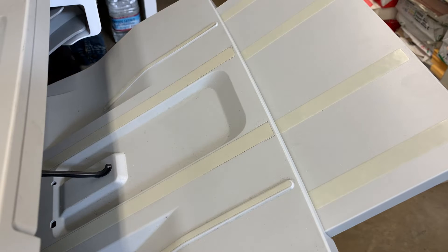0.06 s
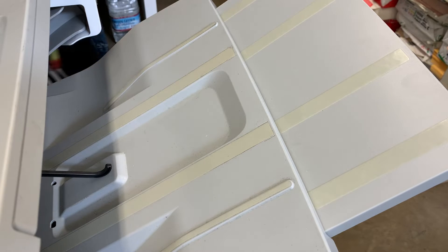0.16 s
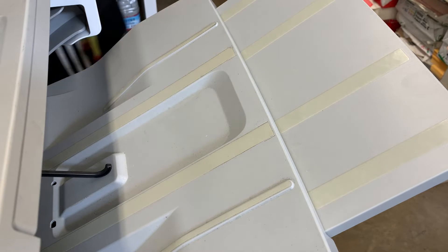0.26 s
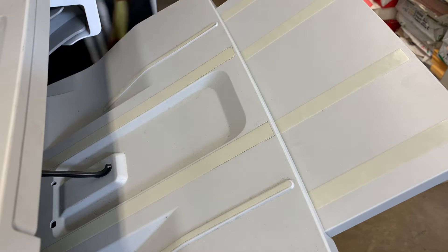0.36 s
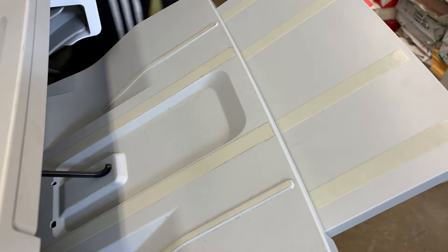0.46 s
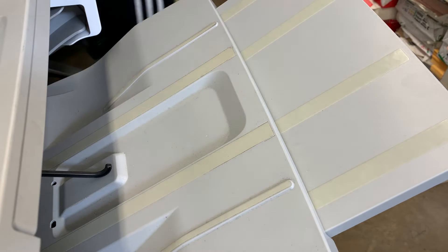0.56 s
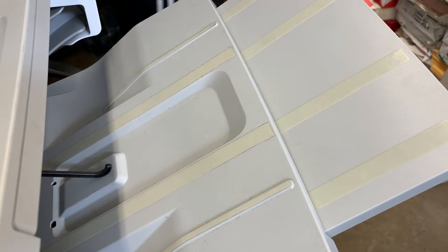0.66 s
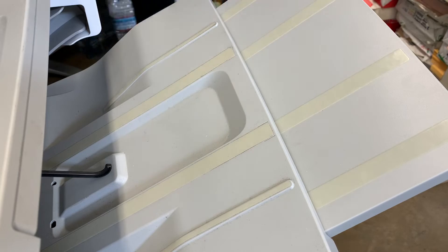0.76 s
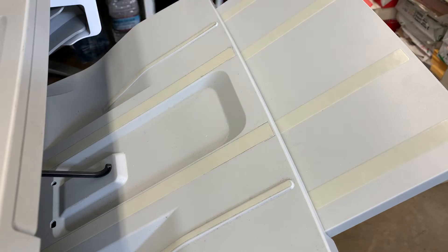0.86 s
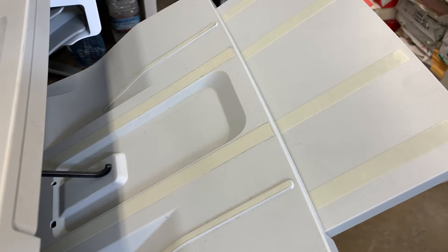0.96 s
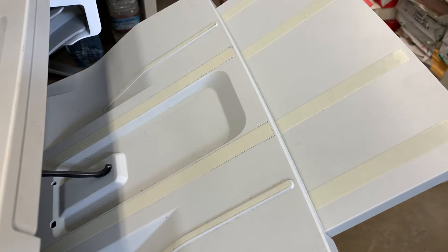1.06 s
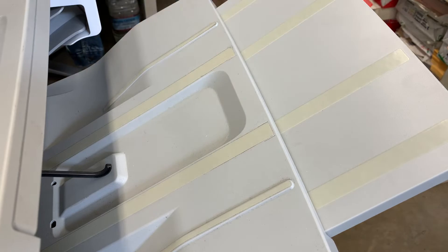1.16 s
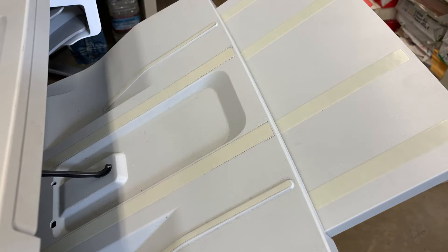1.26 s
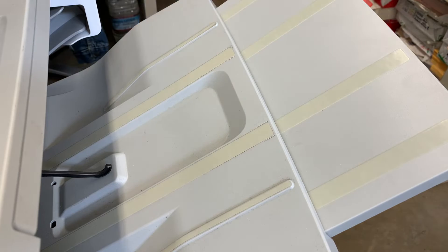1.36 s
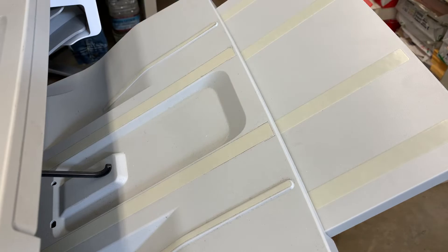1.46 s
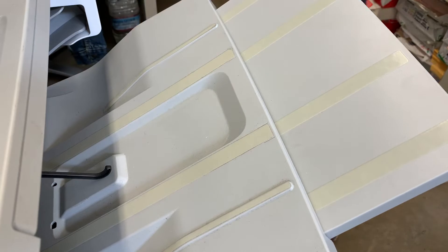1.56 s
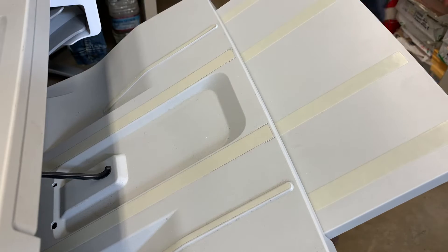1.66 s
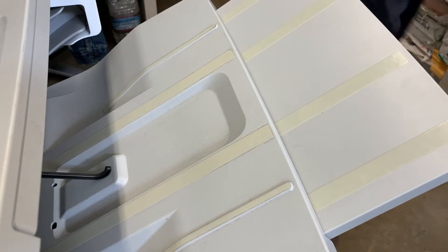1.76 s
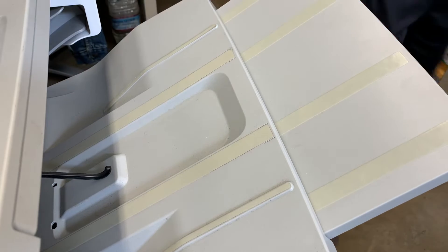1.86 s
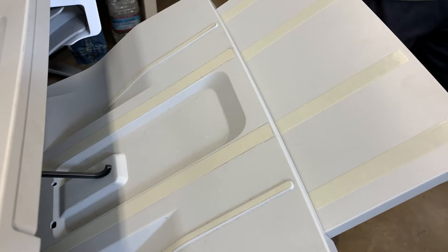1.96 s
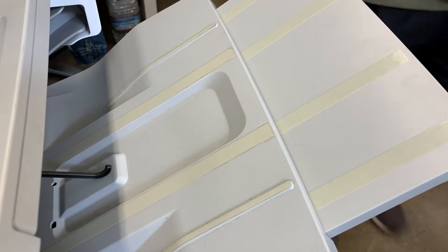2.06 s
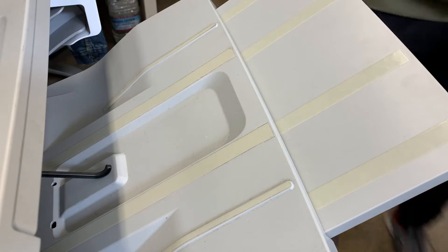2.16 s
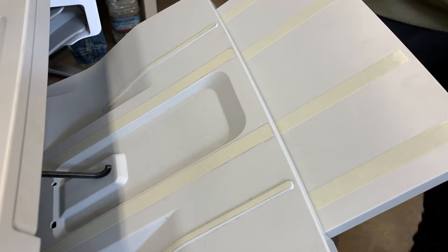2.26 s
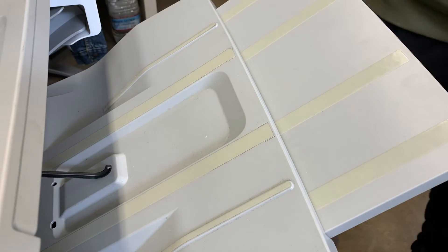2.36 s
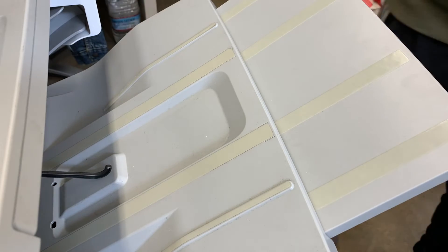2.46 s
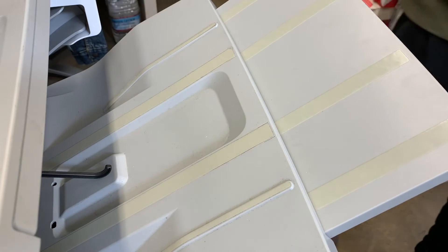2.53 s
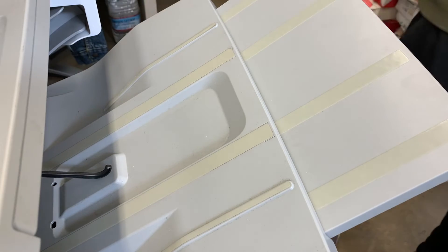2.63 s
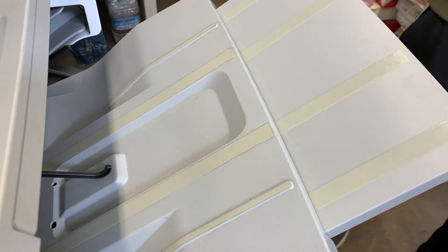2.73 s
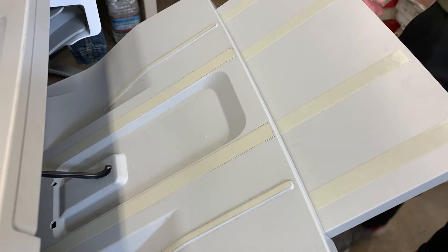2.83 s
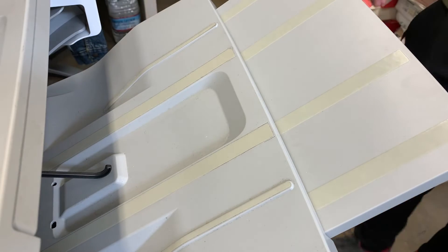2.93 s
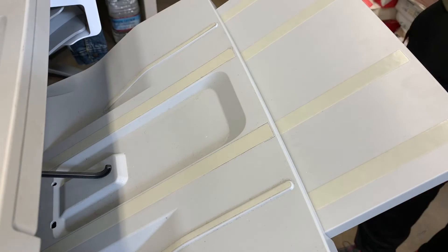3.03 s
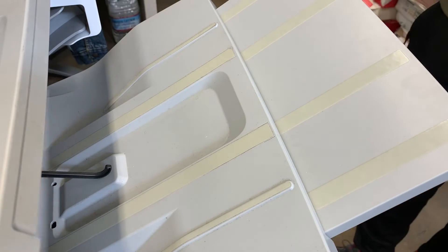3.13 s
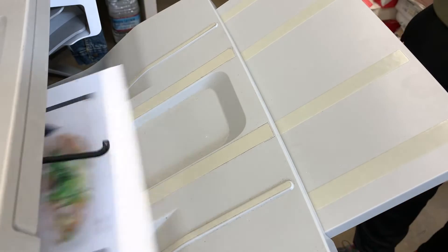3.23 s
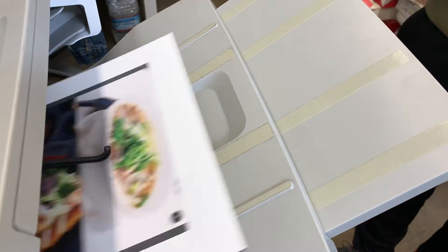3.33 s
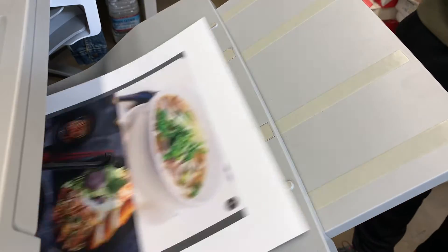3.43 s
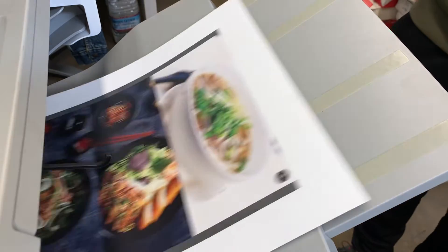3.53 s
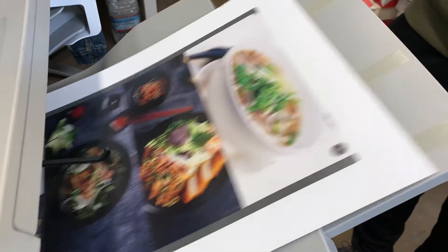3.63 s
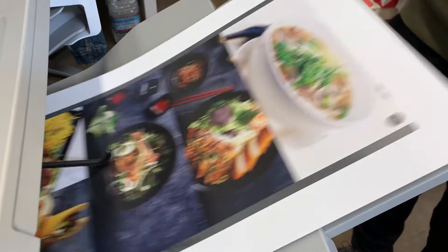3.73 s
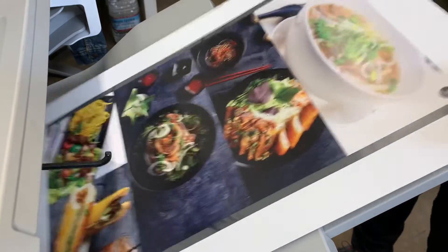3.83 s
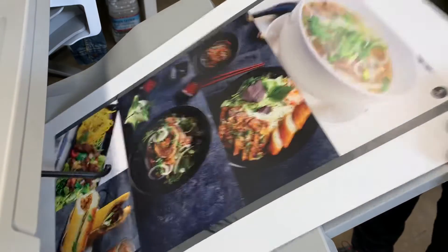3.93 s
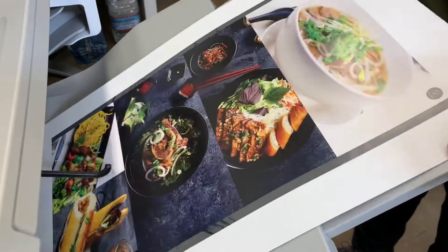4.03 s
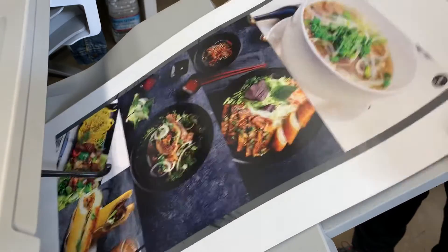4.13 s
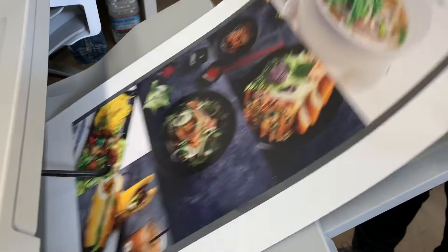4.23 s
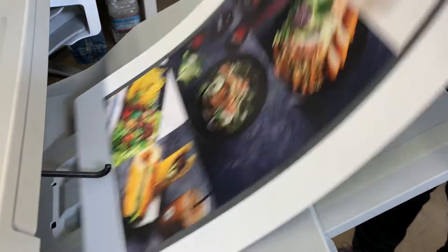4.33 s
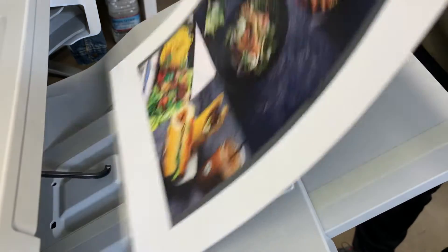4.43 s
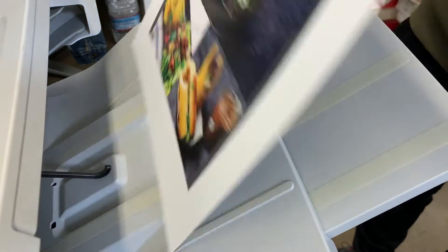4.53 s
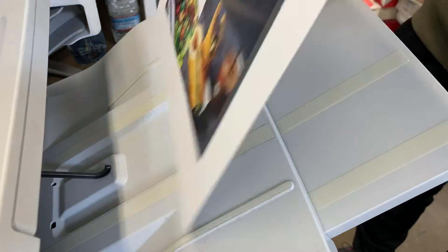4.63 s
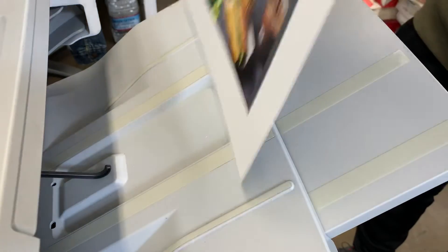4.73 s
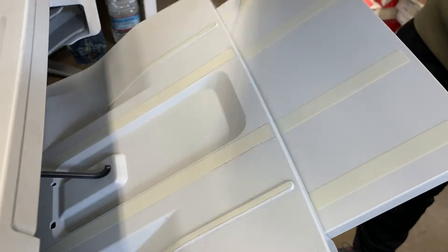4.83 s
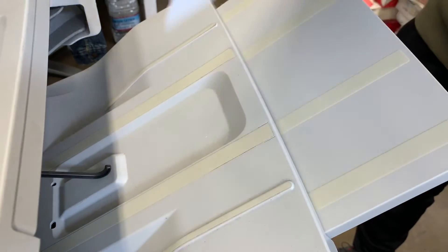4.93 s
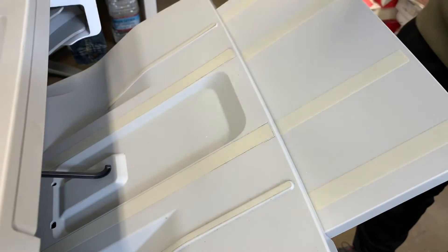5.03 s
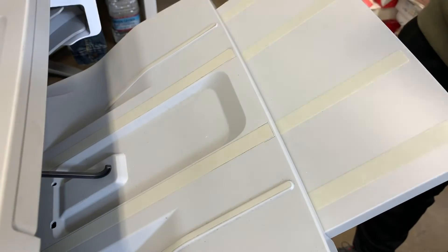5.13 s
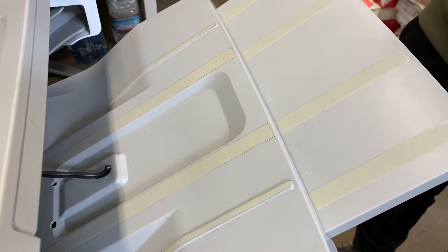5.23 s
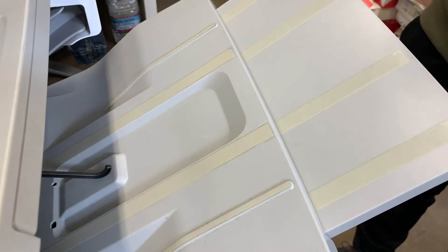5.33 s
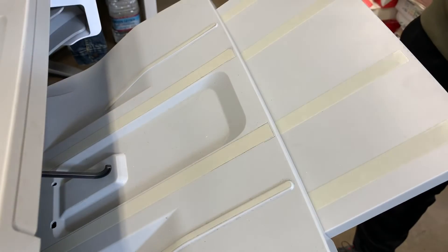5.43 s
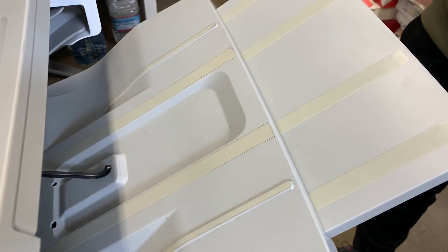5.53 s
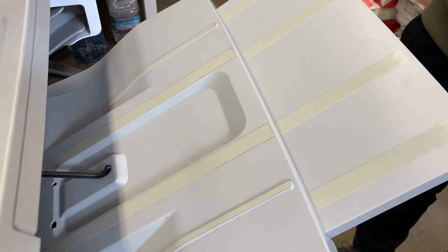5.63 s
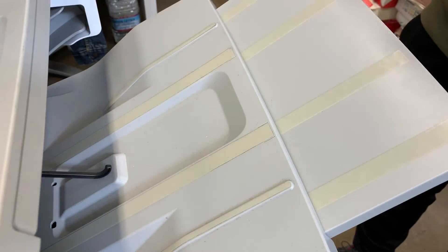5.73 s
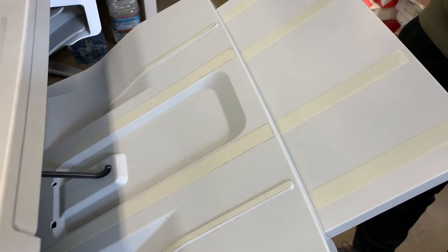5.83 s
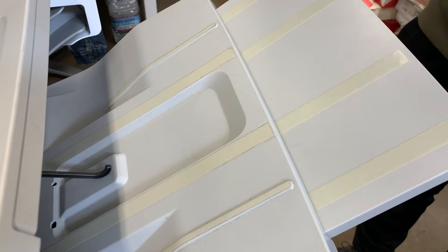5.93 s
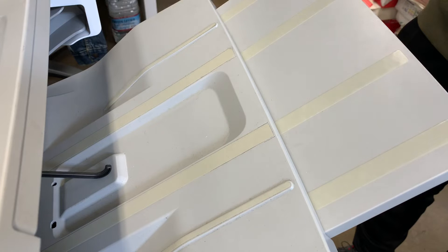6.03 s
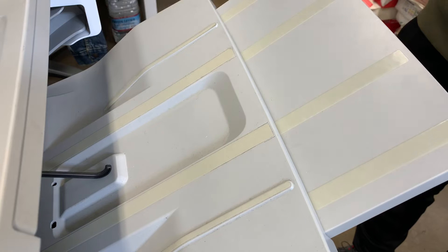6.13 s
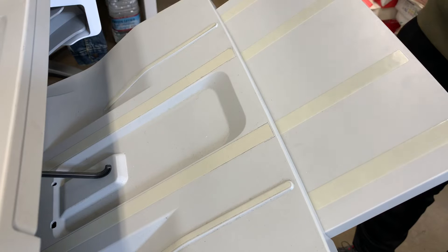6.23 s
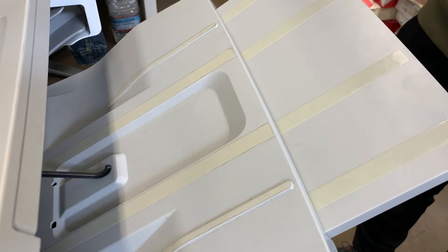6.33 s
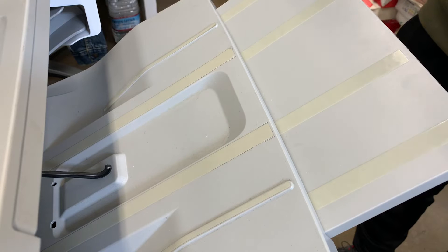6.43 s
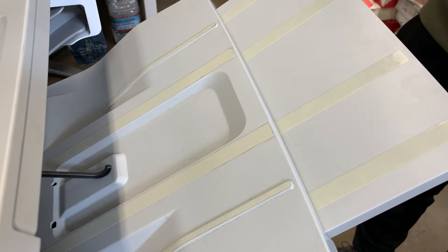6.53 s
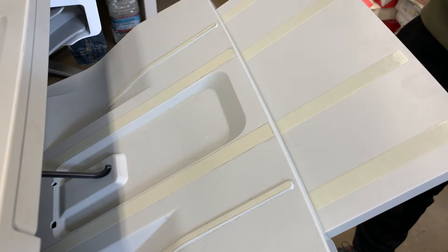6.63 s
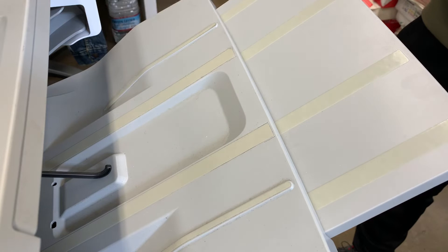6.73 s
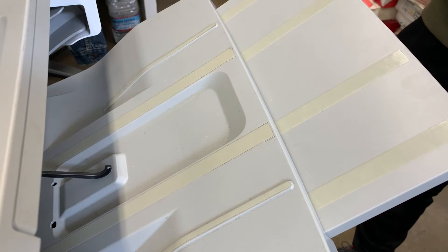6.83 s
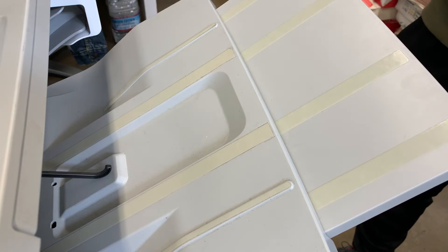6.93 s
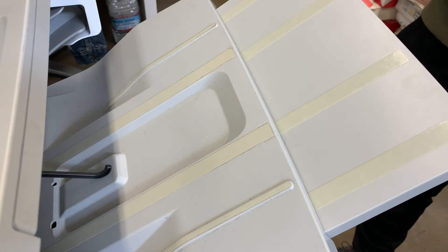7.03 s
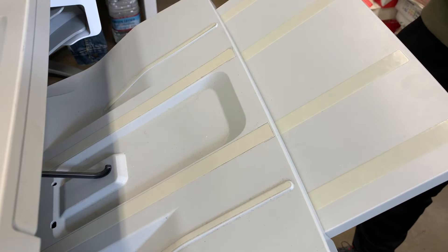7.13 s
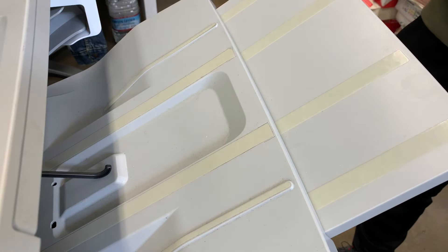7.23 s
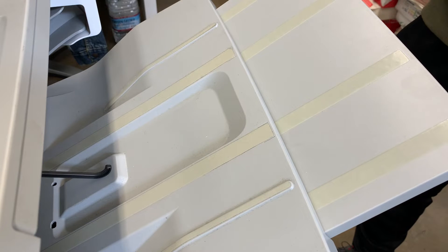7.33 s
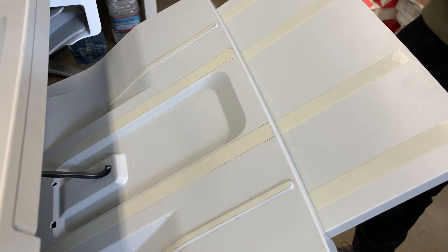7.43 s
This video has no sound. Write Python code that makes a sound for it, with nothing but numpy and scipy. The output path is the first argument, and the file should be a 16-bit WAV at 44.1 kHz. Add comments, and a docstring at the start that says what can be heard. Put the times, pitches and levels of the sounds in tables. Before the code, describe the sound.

A printer drones with small surges at first, heard closely in stereo by a hand-held camera. Someone steps around it with gritty scrapes and crisp ticks. Stiff paper judders out, drums and crinkles on the hollow tray, and is tugged off, its tail and the wire arm smacking the plastic sharply. After a dull floor thud and a few clacks, the machine noise gradually sinks, leaving soft fan air, low hum and a thin faint whine.

```python
"""An office printer in a small room, close to a hand-held camera with two microphone ports:
shaped gear and fan noise, over the sine lines of drive, blades, rotor and mains, to the left.
Someone steps round it on a gritty floor: noise bursts and resonances make scuffs, clicks and knocks.
A sheet, built of tiny grains, comes out, judders by stick-slip under the wire arm and slides over the tray.
It is pulled away with a slap of noise and plastic modes; the drive winds down, leaving fan and hum."""
import sys
import numpy as np
from scipy import signal
from scipy.fft import rfft, irfft, next_fast_len
from scipy.io import wavfile
from scipy.ndimage import uniform_filter1d, map_coordinates

SR = 44100
rng = np.random.default_rng(int(sys.argv[2]) if len(sys.argv) > 2 else 0)


def transcribe(u):
    """Save the signal u as a 16-bit wav file named by the first command-line argument.

    u: samples, shape (n,) or (channels, n), limited to [-1, 1]; the rate is SR.
    q: integer samples, one column per channel.
    """
    v = np.clip(np.atleast_2d(u).T, -1, 1)
    q = np.round(v * 32767).astype(np.int16)
    wavfile.write(sys.argv[1], SR, q)


N = 329943

# All levels in dB are relative; the mix trims some of the layers.
# Steady lines of the drive and of the fan blades. Each row: frequency in Hz, level in dB.
DRIVE_LINES = [(275, -52.5), (330, -52), (440, -50), (552, -54.5), (657, -58), (687, -54.5), (1373, -68.5),
               (1604, -74), (2062, -72.5), (2638, -68.5), (2676, -78), (3806, -75)]
FAN_LINES = [(355, -57.5), (409, -60.5), (549, -65.5), (1071, -75.5), (1610, -74)]
DRIVE_TONES_DB, FAN_TONES_DB = -0.5, 2  # trim of each set of lines
# Spectra of gear noise and fan air. Each row: frequency in Hz, density in dB per Hz.
GEAR_SPECTRUM = [(25, -30.5), (80, -12.5), (170, -5), (330, -2), (500, -6), (800, -10.5), (1200, -18),
                 (2000, -22.5), (2800, -28.5), (4500, -33.5), (7000, -49.5), (10000, -55), (15000, -57.5)]
FAN_SPECTRUM = [(25, -45.5), (80, 7.5), (170, 3.5), (260, -3.5), (420, -2), (700, -9), (1200, -7.5),
                (2000, -20), (3000, -24.5), (4500, -33), (7000, -44), (10000, -54.5), (15000, -58)]
GEAR_WAVER_DB = 1.8  # depth of the shifting patches in the gear noise
# The drive runs steadily, coasts once the sheet is out, then dies faster; the fan eases off slowly.
DRIVE_DB, COAST_S, COAST_DB_PER_S = -41.5, 3.63, 3.0
TONES_COAST_DB_PER_S = 3.5  # the drive's lines fade this much faster than its noise
STOP_S, STOP_DB_PER_S = 6.92, 18  # further fall, on top of the coasting
FAN_DB, FAN_EASE_DB_PER_S = -42, 0.44
# The lowest drive line drones up in surges.
# Each row: start in seconds, rise in seconds, hold in seconds, dB over its usual level.
DRONES = [(0, 0.025, 0.13, 9.5), (0.206, 0.061, 0.23, 10.5), (.58, 0.053, .04, 3), (0.923, 0.088, .04, 2),
          (1.596, 0.043, 0.043, 8.5)]
DRONE_T60_S = 0.25
# The low hum swells and sinks in a slow beat.
ROTOR_DB, BEAT_DEPTH_DB, BEAT_S, FIRST_DIP_S = -47, 2.5, 2.12, 0.22
# A thin whine sets in once the sheet is out.
WHINE_HZ, WHINE_DB, WHINE_FROM_S = 2966, -76.5, 4.5

# Dull bumps of the sheet, the housing and the floor. Each row: time in seconds, level in dB.
BUMPS = [(1.164, -33.5), (1.558, -34), (2.303, -28), (2.698, -30), (2.744, -32.5), (3.487, -28),
         (3.763, -28), (3.829, -27), (3.97, -29.5), (4.091, -29), (5.534, -29.5)]
BUMP_T60_S = 0.23
# Spectrum of a bump. Each row: frequency in Hz, density in dB per Hz.
BUMP_SPECTRUM = [(40, -47), (100, 0.5), (200, -6.5), (350, -1), (500, -8), (750, -19.5), (1200, -26.5),
                 (2000, -28), (4000, -63.5)]
# Light clacks of the mechanism. Each row: time in seconds, level in dB, t60 in seconds.
CLACKS = [(1.165, -39, 0.025), (5.131, -45.5, 0.099), (5.26, -45, 0.052), (5.361, -41.5, 0.074),
          (5.398, -43.5, 0.18), (5.436, -32, 0.11)]
# Spectrum of a clack. Each row: frequency in Hz, density in dB per Hz.
CLACK_SPECTRUM = [(100, -28), (700, 4.5), (1300, -2.5), (1750, -2), (2100, 4.5), (2450, -12), (2750, -10),
                  (3400, -14.5), (6000, -26), (14000, -40)]

# Shoe soles dragging, heel then toe.
# Each row: start in seconds, rise in seconds, hold in seconds, scuff level in dB, grit level in dB.
STEPS = [(1.492, 0.0055, 0.0067, -38, -54), (1.512, 0.013, 0.018, -37.5, -56),
         (1.826, 0.075, 0.0042, -38.5, -52), (2.282, 0.011, 0.037, -40.5, -39),
         (2.343, 0.0093, 0.025, -45, -42), (2.575, 0.017, 0.0053, -42, -38.5),
         (5.127, 0.031, 0.055, -62, -82), (5.359, 0.033, 0.064, -57, -65.5)]
SCUFF_T60_S, GRIT_T60_S = 0.12, 0.077
# Hollow ring of the sole, and squeaks of grit under it. Each row: frequency in Hz, width in Hz, level in dB.
SOLE_MODES = [(1140, 120, 0.5), (2070, 110, 0.5), (2500, 79, -3), (2920, 63, -3.5), (3980, 100, -5),
              (4270, 71, -1), (4740, 140, -6), (5340, 74, -15), (6000, 74, -14)]
GRIT_MODES = [(3670, 52, 2), (5640, 110, -7), (6080, 55, 1), (6750, 250, 1.5), (10060, 160, -4.5)]
SOLE_DB, GRIT_RING_DB = -5, -1
# Spectra of scuff and grit. Each row: frequency in Hz, density in dB per Hz.
SCUFF_SPECTRUM = [(250, -36), (500, 8), (750, -3.5), (1000, 4), (1500, -5), (2000, -3), (2400, -3.5),
                  (3300, -7.5), (4600, -8), (5600, -32), (7000, -35), (9500, -11), (12500, -39)]
GRIT_SPECTRUM = [(300, -38), (2000, -4), (4000, -3), (6500, -0.5), (10000, -4), (15000, -26)]
# A hard heel tip clicks on the floor and skids. Each row: time in seconds, level in dB, t60 in seconds.
CLICKS = [(1.501, -33, .045), (1.54, -45, 0.14), (1.895, -46.5, 0.37)]
# Ring of the heel tip. Each row: frequency in Hz, width in Hz, level in dB.
CLICK_MODES = [(2000, 120, -5), (2400, 100, 4), (2950, 90, -2), (4610, 170, 4), (5600, 110, -3),
               (5950, 90, -6), (6830, 100, -6), (7370, 120, -5), (9670, 440, -8)]
# Heels knock hollowly on the floor, lower as the foot settles.
# Each row: time in seconds, level in dB, t60 in seconds, pitch in Hz.
HEELS = [(1.549, -33, 0.16, 1050), (1.592, -36.5, 0.12, 950), (1.909, -38.5, 0.22, 960),
         (1.956, -43, .14, 900)]
# Spectrum of a knock at the pitch HEEL_HZ. Each row: frequency in Hz, density in dB per Hz.
HEEL_SPECTRUM = [(400, -32), (780, 0), (930, 5), (1100, -9), (1300, -11), (2500, -28), (8000, -63)]
HEEL_HZ = 930

# Crisp ticks of grit, paper and mechanism. Each row: time in seconds, level in dB,
# body in dB and snap in dB relative to that level, ring in Hz.
TICKS = [(1.5007, -25, -7, -24, 5720), (1.736, -54.5, -17, 4, 10900), (2.149, -35.5, 1, -6.5, 5300),
         (2.2907, -20, -12, -22, 6500), (2.3034, -20, -3, -15, 7600), (2.359, -19, -10, -31, 6460),
         (2.587, -27, -9, -11, 6740), (2.7717, -37, -1, -34, 6600), (2.818, -32, -15, -39, 5700),
         (3.1354, -29, -5, -16.5, 6750), (3.3054, -22.5, -5, -6, 6160), (3.3425, -17.5, -11, -32, 6690),
         (3.386, -18.5, -11, -22, 7100), (3.4027, -18, -14, -13, 10630), (3.4415, -25, -12, -13, 10800),
         (3.453, -23, -9, -16, 6950), (3.569, -35, -3, -20, 11500), (3.671, -29, -5, -16, 7400),
         (3.7693, -33.5, 3, -5, 2480), (3.795, -32.5, -10, 2, 11500), (3.8047, -23, -10, -13, 11500),
         (3.8555, -25.5, -8, -20, 10300), (3.8645, -21, -13, -20, 6650), (3.886, -31, -10, -20, 6900),
         (3.9078, -25.5, -14, -4, 12400), (3.9455, -24.5, -13, -8, 4200), (3.972, -16, -4, -11, 7000),
         (3.9977, -16, -5.5, -19.5, 6240), (4.0672, -33, -7.5, -3, 11500), (4.1081, -24, -4.5, -12, 6080),
         (4.2035, -34.5, -14, -4, 3400), (4.2098, -32, -10.5, -11, 5050), (4.2411, -24, -11, -5.5, 5000),
         (4.6124, -30, -17, -15, 6800), (4.7092, -21, -11, -2.5, 7170), (4.786, -41, -11, -12, 7000),
         (5.3956, -46, 6.5, -11, 5010), (5.4372, -41, 7, -19, 2100)]
TICK_T60_S, CRACK_DB = 0.04, -10  # the crack is relative to the tick's level
# A tick rings briefly with a few modes near its pitch; the scatter is a share of it (log scale).
PING_DB, PING_T60_S, PING_SCATTER = -9, 0.03, 0.12
# Smaller crinkles fall at random while the sheet bends.
CRINKLE_FROM_S, CRINKLE_TO_S, CRINKLE_DB, CRINKLE_SPREAD_DB = 3.3, 4.03, -33, 1.8
CRINKLE_BODY_DB, CRINKLE_SNAP_DB = -7, -10.5
CRINKLE_LOW_HZ, CRINKLE_HIGH_HZ = 4500, 12000
# Spectra of the rustling sheet, its hiss, the tray drumming and a bright snap.
# Each row: frequency in Hz, density in dB per Hz.
RUSTLE_SPECTRUM = [(400, -27.5), (800, 1), (1200, 1.5), (1800, 0.5), (3000, -5), (4500, -12.5),
                   (8000, -38.5)]
HISS_SPECTRUM = [(1500, -31), (3000, -5), (4500, -1), (7000, 1.5), (10000, -3), (12500, -6.5),
                 (15500, -5.5)]
TRAY_SPECTRUM = [(40, -31), (150, 0), (250, 0), (370, 3.5), (560, -1), (900, -6.5), (1500, -22),
                 (5000, -72)]
SNAP_SPECTRUM = [(5000, -36), (8500, -5), (10500, -0.5), (15500, -7.5)]

# Faint swishes of paper on its way through the rollers.
# Each row: start in seconds, rise in seconds, hold in seconds, level in dB.
SWISHES = [(1.845, .26, .03, -59), (2.304, 0.14, 0.64, -65.5)]
SWISH_T60_S = 0.39
# The sheet touches the tray from its arrival until a hand lifts it, ever more lightly.
ARRIVE_S, TOUCH_RISE_S, TOUCH_HOLD_S, LIGHTEN_DB_PER_S = 3.131, 0.017, 0.93, 10
TOUCH_DB = (-39, -41.5, -45)  # tray drumming, rustle, hiss on arrival
# Pushes and pulls that rub it harder. Each row: start in seconds, rise in seconds, hold in seconds,
# tray drumming in dB, rustle in dB, hiss in dB.
STROKES = [(3.14, 0.025, 0.14, -32, -47.5, -60), (3.287, 0.039, 0.1, -34.5, -39, -39),
           (3.435, 0.012, 0.02, -28.5, -39, -35), (3.753, 0.056, 0.012, -35, -39, -44),
           (3.847, 0.018, 0.092, -42.5, -44, -42), (3.961, 0.0064, .002, -33.5, -36, -38),
           (3.988, .006, .02, -33.5, -37, -34), (4.11, .01, .07, -47.5, -54, -62),
           (4.202, .012, 0.04, -47, -54, -51.5), (4.241, 0.017, 0.1303, -50, -55, -55.5),
           (4.393, .024, 0.02, -43, -46.5, -44), (4.441, 0.0066, 0.0043, -29, -26, -31.5),
           (4.484, 0.022, 0.12, -56.5, -55, -56), (4.645, 0.017, .02, -35.5, -48.5, -49),
           (4.689, 0.016, .005, -38, -42.5, -41), (4.724, 0.018, 0.028, -54.5, -62, -62)]
STROKE_T60_S = (0.33, 0.16, 0.16)  # tray drumming, rustle, hiss
SCRAPE_DB = 2.2  # the scrape keeps changing colour as the sheet bends, by this depth

# Stick-slip of the leading edge: start, rise, hold and t60 in seconds.
JUDDER_SHAPE, JUDDER_DB = (3.132, 0.024, 0.169, 0.019), -28.5
JUDDER_GROWS_DB_PER_S = 13  # the edge presses harder as the sheet advances
SLIP_HZ, SLIP_JITTER = 236.5, 0.011  # settled slip rate, its jitter as a share
SLIP_START_SHARE, SLIP_SETTLE_S = 0.09, 0.015  # the edge slips faster at first
# Overtones of the buzz. Each row: multiple of the slip rate, level in dB.
JUDDER_ORDERS = [(1, -16.5), (2, -2), (3, 2.5), (4, -15), (5, -35), (6, -19), (7, -34), (8, -47), (9, -37),
                 (10, -27)]
# The edge grates at every slip. Each row: frequency in Hz, width in Hz, level in dB.
GRATE_MODES = [(570, 52, -10), (785, 69, 2), (940, 55, 2), (1175, 72, -7), (1536, 60, -3.5), (1660, 55, -8),
               (2130, 80, -11)]
GRATE_DB = -14.5
# The hollow between arched sheet and tray. Each row: frequency in Hz, width in Hz, level in dB.
HOLLOW_MODES = [(332, 30, 1), (413, 28, -2), (540, 30, -4.5), (704, 30, -7), (833, 25, -8.5),
                (1062, 50, -12.5)]
HOLLOW_SHAPE, HOLLOW_DB = (3.3, 0.097, 0.32, 1.6), -41  # start, rise, hold, t60 in seconds
# The loose sheet flaps against the tray. Each row: time in seconds, level in dB.
FLAPS = [(3.454, -32), (3.765, -35.5), (3.803, -34.5), (3.997, -34), (4.667, -34.5), (4.711, -32),
         (4.733, -39.5)]
FLAP_T60_S = 0.16
# Spectrum of a flap. Each row: frequency in Hz, density in dB per Hz.
FLAP_SPECTRUM = [(120, -31.5), (350, -0.5), (560, 1), (800, -5), (1100, -3), (1600, -10.5), (2400, -24),
                 (6000, -43.5)]

# The arm and the tail of the sheet hit the tray. Each row: time in seconds, level in dB, t60 in seconds.
SLAPS = [(4.4485, -30, 0.048), (4.4524, -7.5, 0.031), (4.4567, -7.5, 0.043), (4.47, -38, .14)]
SLAP_SNAP = (4.4522, -9, 0.011)  # the bright snap of contact: time in seconds, dB, t60 in seconds
# Spectrum of the slap. Each row: frequency in Hz, density in dB per Hz.
SLAP_SPECTRUM = [(60, -47.5), (150, -16), (350, -3.5), (650, -16), (1100, 5.5), (1650, -11.5), (2400, -9.5),
                 (3300, -7), (4300, -2.5), (6500, -6.5), (10000, -26.5), (15000, -32)]
# Modes of the plastic tray. Each row: frequency in Hz, level in dB, t60 in seconds.
PLASTIC_MODES = [(341, -15, .21), (657, -7, .2), (957, -8, .12), (1038, -7.5, .1), (1148, 1, .07),
                 (1296, -11, .08), (1434, -13, .2), (2192, -5.5, .08), (2380, -8, .07), (2850, -6, .09),
                 (4058, -2, .07), (4494, -9, .06), (4618, -6, .07), (5115, -9, .05)]
# Heel, sole and weight of one heavy step land in turn.
# Each row: time in seconds, thud in dB, knock of the boards in dB.
FOOTFALLS = [(5.152, -39, -36), (5.162, -33.5, -27), (5.187, -27.5, -37), (5.218, -31, -35)]
FOOTFALL_T60_S, BOARDS_ATTACK_S = 0.21, 0.005
# Spectrum of the thud. Each row: frequency in Hz, density in dB per Hz.
FOOTFALL_SPECTRUM = [(25, -18), (50, 4.5), (90, 6), (200, -3.5), (350, 3.5), (500, -5), (750, -18),
                     (1200, -27), (2000, -23.5), (4000, -56)]
# Floor boards ringing under it. Each row: frequency in Hz, level in dB, t60 in seconds.
BOARD_MODES = [(265.2, -7.5, .1), (344.7, 1.5, 0.11), (429.6, -2, .11), (504, -4, .09), (640, -6, .07),
               (770, -7, .06)]

# Decay of the small room. Each row: frequency in Hz, t60 in seconds.
ROOM_T60 = [(200, 0.149), (1000, 0.46), (4000, 0.61), (8000, 0.13), (15000, 0.25)]
# Likeness of diffuse sound at the two ports. Each row: frequency in Hz, likeness from 0 to 1.
ALIKE = [(150, 1), (400, 0.69), (900, 0.75), (1400, 0.62), (2800, 0.23), (5000, 0.055), (7000, 0.18),
         (8000, 1)]
# Level balance of the ports. Each row: frequency in Hz, left over right in dB.
LEAN = [(100, -2.5), (180, -0.5), (300, 2.5), (500, 2), (750, 4), (1200, 2), (2000, 0.5), (3500, 0.5),
        (5500, -2.5), (8000, 0)]
# Arrival at the ports: sheet, steps and room; slap, clacks and footfall, nearly in front;
# fan and gears, well to the left. Each row: frequency in Hz, radians by which left leads.
LEAD = [(0, .3), (300, .55), (800, 1.6), (2760, 3.14), (16540, -12.57)]
AHEAD_LEAD = [(0, .2), (1200, .9), (2760, 2.3), (4000, .7), (5200, 1), (8270, -2.5), (16540, -12.57)]
MACHINE_LEAD = [(0, .3), (300, .8), (950, 2.3), (1500, 3.1), (2700, 3.8), (16540, 6.28)]
TOP_HZ = 15850  # band limit of the camera


def amp(db):
    """Decibels to gain."""
    return 10 ** (np.asarray(db) / 20)


def unit(x):
    """x at rms 1."""
    return x / np.sqrt(np.mean(x ** 2) + 1e-20)


def seconds():
    """The time of every sample."""
    return np.arange(N) / SR


def white():
    """Two unrelated white noises."""
    return rng.standard_normal((2, N))


def along(points, hz):
    """Interpolate (Hz, value) points on a log frequency axis."""
    f, v = np.transpose(points)
    return np.interp(np.log(hz + 1), np.log(f + 1), v)


def wobble(rate):
    """A smooth random curve with rate knots a second."""
    knots = rng.standard_normal(int(N * rate / SR) + 4)
    return map_coordinates(knots, [np.arange(N) * rate / SR])


def swell(start, rise, hold, t60):
    """Gain that rises, holds and dies away."""
    t = seconds() - start
    attack = np.clip(t / max(rise, 1e-3), 0, 1) ** 2
    return attack * amp(-60 * np.maximum(t - rise - hold, 0) / max(t60, 1e-2))


def filtered(x, response):
    """x times a complex response of frequency."""
    m = next_fast_len(N + SR // 4)
    return irfft(rfft(x, m) * response(np.fft.rfftfreq(m, 1 / SR)), m)[..., :N]


def coloured(x, spectrum, size=4096):
    """x through a causal minimum-phase filter of unit energy with the given spectrum."""
    cepstrum = irfft(np.log(amp(along(spectrum, np.fft.rfftfreq(size, 1 / SR)))))
    folded = np.r_[cepstrum[0], 2 * cepstrum[1:size // 2]]
    kernel = irfft(np.exp(rfft(folded, size)))
    return signal.oaconvolve(x, kernel[None] / np.linalg.norm(kernel), axes=1)[:, :N]


def noise(spectrum):
    """Two unrelated noises of about rms 1 with the given spectrum."""
    return coloured(white(), spectrum)


def resonant(x, peaks):
    """x through a bank of band resonances of alternating sign, at rms 1."""
    def response(f):
        total = 0
        for k, (centre, width, db) in enumerate(peaks):
            damping = 1j * f * width
            total = total + (-1) ** k * amp(db) * damping / (centre ** 2 - f * f + damping)
        return total
    return unit(filtered(x, response))


def patchy(pair, depth_db, size=1024):
    """Shift a noise's colour: patches swell and sink, wider and quicker for a small size."""
    z = signal.stft(pair, nperseg=size)[2]
    field = uniform_filter1d(rng.standard_normal(z.shape[1:]), size=6, axis=0)
    field = uniform_filter1d(field, size=9, axis=1)
    return unit(signal.istft(z * amp(depth_db * unit(field)), nperseg=size)[1][:, :N])


def add_at(out, s, sound):
    """Add a short pair of signals to out at s seconds."""
    out[:, round(s * SR):][:, :sound.shape[1]] += sound


def bursts(rows):
    """A pair of dying noise bursts for each (s, dB, t60) row."""
    out, t = np.zeros((2, N + SR)), np.arange(SR // 3) / SR
    for s, db, t60 in rows:
        decay = amp(db - 60 * t / max(t60, 0.003))
        add_at(out, s, decay * rng.standard_normal((2, len(t))))
    return out[:, :N]


def at_ports(phase, hz, lead):
    """A tone of rms 1 that leads at the left port by a phase, and is unequally loud at the two."""
    sides = np.array([[1], [-1]]) / 2
    return np.sqrt(2) * amp(sides * along(LEAN, hz)) * np.sin(phase + sides * lead)


def tone(hz, drift_hz, flutter_db, lead):
    """A sine line unsteady in pitch and level."""
    phase = 2 * np.pi * (np.cumsum(hz + drift_hz * wobble(9)) / SR + rng.random())
    return at_ports(phase, hz, lead) * amp(flutter_db * wobble(5.3))


def drive_db():
    """Level change of the drive: friction slows it once it coasts, until it dies away."""
    t = seconds()
    return -COAST_DB_PER_S * np.maximum(t - COAST_S, 0) - STOP_DB_PER_S * np.maximum(t - STOP_S, 0)


def machine_air():
    """Gears make a patchy noise that coasts down; the fan's air noise eases off slowly."""
    gear_gain = amp(DRIVE_DB + drive_db() + 0.65 * wobble(12))
    gears = gear_gain * patchy(noise(GEAR_SPECTRUM), GEAR_WAVER_DB)
    fan_gain = amp(FAN_DB - FAN_EASE_DB_PER_S * seconds() + 1.3 * wobble(6.8))
    return gears + fan_gain * noise(FAN_SPECTRUM)


def mains_hum():
    """The mains hums at about twice its frequency."""
    return amp(-40.0) * tone(120.1, drift_hz=0.29, flutter_db=0.1, lead=0.48)


def rotor_hum():
    """The rotor's low line swells and sinks in a slow beat."""
    beat_db = -BEAT_DEPTH_DB * np.cos(2 * np.pi * (seconds() - FIRST_DIP_S) / BEAT_S)
    return amp(ROTOR_DB + beat_db) * tone(54.6, drift_hz=0.54, flutter_db=2.0, lead=0.3)


def drive_lines():
    """The drive sings in sine lines, the lowest surging into drones; they fade as it coasts."""
    lines = [amp(db) * tone(hz, drift_hz=1.07, flutter_db=1.6, lead=1.0) for hz, db in DRIVE_LINES]
    surge = sum((amp(db) - 1) * swell(s, rise, hold, DRONE_T60_S) for s, rise, hold, db in DRONES)
    fade_db = -TONES_COAST_DB_PER_S * np.maximum(seconds() - COAST_S, 0)
    return amp(DRIVE_TONES_DB + drive_db() + fade_db) * (sum(lines) + surge * lines[0])


def fan_lines():
    """The fan blades give fluttering sine lines that ease off with the air."""
    blades = sum(amp(db) * tone(hz, drift_hz=1.31, flutter_db=4.5, lead=0.98) for hz, db in FAN_LINES)
    return amp(FAN_TONES_DB - FAN_EASE_DB_PER_S * seconds()) * blades


def bumps():
    """Soft contacts are dull: bursts of noise with little treble."""
    return amp(-5.5) * coloured(bursts([(s, db, BUMP_T60_S) for s, db in BUMPS]), BUMP_SPECTRUM)


def clacks():
    """Light parts of the mechanism strike: short bursts of mid-range noise."""
    return coloured(bursts(CLACKS), CLACK_SPECTRUM)


def soles():
    """Soles drag over the floor in grains: a scuff with a hollow ring, and squeaking, grinding grit."""
    scuff = sum(amp(db) * swell(s, rise, hold, SCUFF_T60_S) for s, rise, hold, db, _ in STEPS)
    grit = sum(amp(db) * swell(s, rise, hold, GRIT_T60_S) for s, rise, hold, _, db in STEPS)
    grain = unit(amp(2.4 * wobble(500)))
    rub = amp(-4.5) * noise(SCUFF_SPECTRUM) + amp(SOLE_DB) * resonant(grain * white(), SOLE_MODES)
    grind = amp(-0.5) * noise(GRIT_SPECTRUM) + amp(GRIT_RING_DB) * resonant(white(), GRIT_MODES)
    return scuff * rub + grain * grit * grind


def crinkles(count=16):
    """Small ticks of the bending sheet, at random times, strengths and pitches."""
    times = rng.uniform(CRINKLE_FROM_S, CRINKLE_TO_S, count)
    levels = CRINKLE_DB + CRINKLE_SPREAD_DB * rng.standard_normal(count)
    pitches = CRINKLE_LOW_HZ * (CRINKLE_HIGH_HZ / CRINKLE_LOW_HZ) ** rng.random(count)
    return [(s, db, CRINKLE_BODY_DB, CRINKLE_SNAP_DB, hz) for s, db, hz in zip(times, levels, pitches)]


def pings(rows):
    """Each (s, dB, Hz) row rings a small cluster of modes, drawn anew every time."""
    out, t = np.zeros((2, N + SR)), np.arange(SR // 20) / SR
    spread = np.linspace(0, 1, 4)[:, None]  # the first mode keeps the pitch, the last strays most
    for s, db, hz in rows:
        detune, phase = rng.standard_normal((2, 2, 4, 1))
        mode_hz = hz * np.exp(PING_SCATTER * detune * spread)
        # t carries no factor 2 pi inside mode_hz, so it is applied with the phase, in turns
        modes = np.sin(2 * np.pi * (mode_hz * t + phase)).mean(axis=1)
        add_at(out, s, 2 * amp(db + PING_DB - 60 * t / PING_T60_S) * modes)
    return out[:, :N]


def ticks():
    """Each tick is a crack over a body, opened by a bright snap and ringing at its own pitch."""
    rows = TICKS + crinkles()
    crack = bursts([(s, db + CRACK_DB, TICK_T60_S) for s, db, *_ in rows])
    body = bursts([(s, db + body_db - 7.0, TICK_T60_S) for s, db, body_db, *_ in rows])
    snap = bursts([(s, db + snap_db + 1.5, 0.4 * TICK_T60_S) for s, db, _, snap_db, _ in rows])
    ring = pings([(s, db, hz) for s, db, *_, hz in rows])
    return (coloured(crack, HISS_SPECTRUM) + coloured(body, RUSTLE_SPECTRUM)
            + coloured(snap, SNAP_SPECTRUM) + ring)


def heel_clicks():
    """A hard heel tip excites narrow bright resonances that die as it skids."""
    gain = sum(amp(db) * swell(s, 0.00074, 0, t60) for s, db, t60 in CLICKS)
    return gain * resonant(white(), CLICK_MODES)


def heel_knocks():
    """Heels knock hollowly: noise bursts whose spectrum is shifted to each pitch."""
    out = np.zeros((2, N))
    for s, db, t60, hz in HEELS:
        shifted = [(f * hz / HEEL_HZ, level) for f, level in HEEL_SPECTRUM]
        out += coloured(bursts([(s, db, t60)]), shifted)
    return out


def swishes():
    """Paper slips through the rollers with a faint hiss."""
    gain = sum(amp(db) * swell(s, rise, hold, SWISH_T60_S) for s, rise, hold, db in SWISHES)
    return gain * noise(HISS_SPECTRUM)


def rubbing():
    """Gains of drumming, rustle and hiss: a lightening touch, with the power of each stroke on top."""
    lighten_db = -LIGHTEN_DB_PER_S * np.maximum(seconds() - ARRIVE_S, 0)
    layers = []
    for k, t60 in enumerate(STROKE_T60_S):
        touch = amp(TOUCH_DB[k] + lighten_db) * swell(ARRIVE_S, TOUCH_RISE_S, TOUCH_HOLD_S, t60)
        strokes = [amp(levels[k]) * swell(s, rise, hold, t60) for s, rise, hold, *levels in STROKES]
        layers.append(np.linalg.norm([touch, *strokes], axis=0))
    return layers


def crackle(rate, life, spread_db, size=256):
    """Tiny pings of paper fibres at random pitches and sizes, rms 1."""
    when, pitch, strength, side = rng.random((int(rate * N / SR), 4)).T
    t = np.arange(size) / SR
    grains = np.exp(-t / life) * np.sin(2 * np.pi * TOP_HZ * pitch[:, None] * t)
    grains *= amp(spread_db * strength ** 3)[:, None]
    starts = (when * (N - size) + N * (side > 0.5)).astype(int)  # left port, then right, end to end
    index = starts[:, None] + np.arange(size)
    return unit(np.bincount(index.ravel(), grains.ravel(), 2 * N).reshape(2, N))


def sliding_sheet():
    """Paper catches on the ribs in tiny clumped grains: it hisses, rustles and drums on the tray."""
    drum, rustle, hiss = rubbing()
    clumps = unit(amp(2 * wobble(500) + 1.7 * wobble(60)))
    friction = clumps * unit(crackle(rate=3500, life=0.0006, spread_db=16) + 0.65 * white())
    rustling = patchy(coloured(friction, RUSTLE_SPECTRUM), SCRAPE_DB, size=512)
    # the ports are swapped, so that hiss and rustle differ
    hissing = patchy(coloured(friction[::-1], HISS_SPECTRUM), SCRAPE_DB, size=384)
    return amp(3.5) * rustle * rustling + amp(2.5) * hiss * hissing + drum * noise(TRAY_SPECTRUM)


def judder():
    """The leading edge sticks and slips, so the sheet buzzes briefly; weak overtones are the roughest."""
    shape = swell(*JUDDER_SHAPE)
    on = shape > 1e-4
    t = seconds()[on] - JUDDER_SHAPE[0]
    press = amp(JUDDER_DB + JUDDER_GROWS_DB_PER_S * t)
    settle = SLIP_START_SHARE * np.exp(-t / SLIP_SETTLE_S)
    slip_hz = SLIP_HZ * (1 + settle + SLIP_JITTER * wobble(240)[on])
    phase = 2 * np.pi * np.cumsum(slip_hz) / SR
    grate = resonant(rng.standard_normal(N), GRATE_MODES)[on]
    buzz = np.zeros((2, N))
    buzz[:, on] = press * amp(GRATE_DB) * (1 + np.cos(phase)) * grate
    for k, level in JUDDER_ORDERS:
        rough_db = (1.2 - 0.1 * level) * wobble(140)[on]
        buzz[:, on] += press * amp(level - 5.0 + rough_db) * at_ports(k * phase, k * SLIP_HZ, lead=1.5)
    return shape * buzz


def hollow():
    """The air between the arched sheet and the tray resonates."""
    return amp(HOLLOW_DB) * swell(*HOLLOW_SHAPE) * resonant(white(), HOLLOW_MODES)


def flaps():
    """The loose sheet pats the tray: dying bursts of low-mid noise."""
    return coloured(bursts([(s, db, FLAP_T60_S) for s, db in FLAPS]), FLAP_SPECTRUM)


def slaps():
    """A bright snap and a broad crack, then the short ring of the plastic tray."""
    ring, t = np.zeros((2, N + SR)), np.arange(SR // 3) / SR
    for s, db, _ in SLAPS:
        modes = 0
        for hz, level, t60 in PLASTIC_MODES:
            # the flexing tray scatters the phase of each mode (in turns)
            scatter = 0.012 * np.cumsum(rng.standard_normal((2, len(t))), axis=1)
            phase = rng.random((2, 1)) + scatter
            modes = modes + amp(level - 60 * t / t60) * np.sin(2 * np.pi * (hz * t + phase))
        add_at(ring, s, amp(db - 9.5) * modes * (1 - np.exp(-t / 0.00037)))
    crack = amp(-5.0) * coloured(bursts(SLAPS), SLAP_SPECTRUM)
    return crack + coloured(bursts([SLAP_SNAP]), SNAP_SPECTRUM) + ring[:, :N]


def whine():
    """A thin, fluttering line fades in over half a second."""
    fade_in = np.clip(seconds() - WHINE_FROM_S, 0, 0.5) * 2
    return amp(WHINE_DB) * fade_in * tone(WHINE_HZ, drift_hz=2.0, flutter_db=3.5, lead=0.95)


def footfall():
    """A heavy step thuds to the right, and the boards knock under its heel in decaying modes."""
    thuds = bursts([(s, db, FOOTFALL_T60_S) for s, db, _ in FOOTFALLS])
    knock, t = np.zeros((2, N + SR)), np.arange(SR // 3) / SR
    for s, _, db in FOOTFALLS:
        modes = 0
        for hz, level, t60 in BOARD_MODES:
            sine = np.sin(2 * np.pi * (hz * t + rng.random((2, 1))))
            modes = modes + amp(level - 60 * t / t60) * sine
        add_at(knock, s, amp(db) * modes * (1 - np.exp(-t / BOARDS_ATTACK_S)))
    return (coloured(thuds, FOOTFALL_SPECTRUM) + knock[:, :N]) * amp([[-3], [3]])


def panels(pair, echo_db, span, count=8):
    """Nearby panels return weak copies within about span seconds, which comb the sound."""
    out = pair.copy()
    for left, right, sign in rng.random((count, 3)):
        for channel, share in enumerate((left, right)):
            lag = int((0.0005 + share * span) * SR) + 1
            out[channel, lag:] += np.sign(sign - 0.5) * amp(echo_db) * pair[channel, :-lag]
    return out / np.sqrt(1 + count * amp(echo_db) ** 2)


def room(pair):
    """A diffuse tail of noise that decays at its own pace in each band."""
    hz, t, z = signal.stft(rng.standard_normal((2, SR // 2)), SR, nperseg=256)
    decay = amp(-60 * t / along(ROOM_T60, hz)[:, None])
    tail = signal.istft(z * decay, SR, nperseg=256)[1]
    return signal.oaconvolve(pair, tail / np.linalg.norm(tail[0]), axes=1)[:, :N]


def ports(pair, lead):
    """Diffuse sound is only partly alike at the two ports, and reaches one of them first."""
    def blend(hz):
        turn = np.arccos(np.clip(along(ALIKE, hz), 0, 1)) / 2
        return np.array([np.cos(turn), np.sin(turn)])

    def left_and_right(hz):
        left = amp(along(LEAN, hz) / 2) * np.exp(0.5j * np.interp(hz, *np.transpose(lead)))
        return np.array([left, 1 / left])

    mid, side = filtered(pair, blend)
    return filtered(np.array([mid + side, mid - side]), left_and_right)


def scene():
    """Everything sounds in one small room; the buzzing sheet lies toward the left port."""
    lines = mains_hum() + rotor_hum() + drive_lines() + fan_lines() + whine()
    paper = swishes() + sliding_sheet() + hollow() + flaps()
    near = panels(paper + ticks() + bumps(), echo_db=-10.5, span=0.006)
    far = panels(soles() + heel_clicks() + heel_knocks(), echo_db=-10.5, span=0.005)
    ahead = slaps() + footfall() + clacks()
    tail = room(amp(-11.5) * near + amp(-16.5) * far + amp(-16.0) * ahead)
    buzz = judder() * amp([[3], [-2.5]])
    diffuse = ports(machine_air(), MACHINE_LEAD) + ports(near + far + tail, LEAD) + ports(ahead, AHEAD_LEAD)
    return diffuse + lines + buzz


def record(dry):
    """The camera rounds off the highest peaks and cuts steeply above its band limit."""
    rounded = dry / (1 + (dry / 0.95) ** 6) ** (1 / 6)
    return filtered(rounded, lambda hz: 1 / (1 + (hz / TOP_HZ) ** 120))


dry = scene()
out = record(dry)
transcribe(out)
```